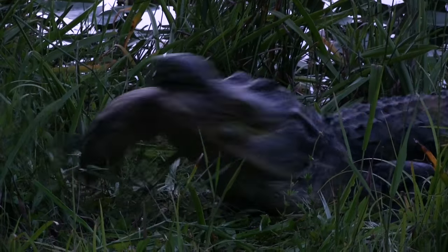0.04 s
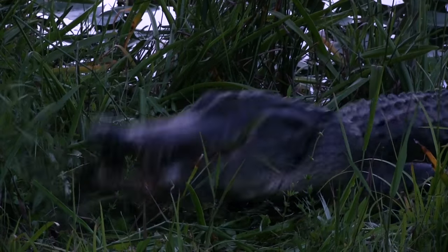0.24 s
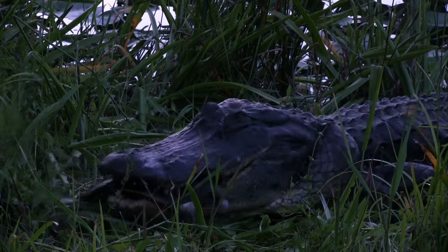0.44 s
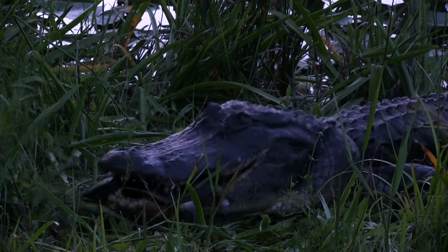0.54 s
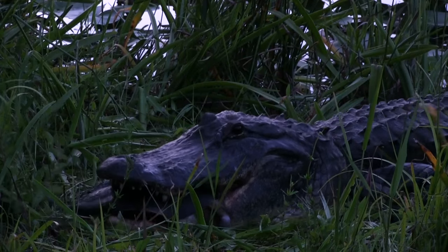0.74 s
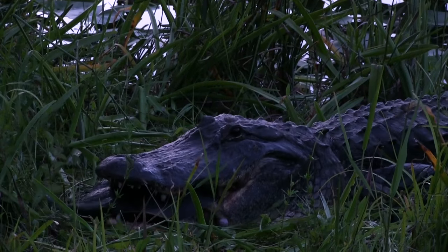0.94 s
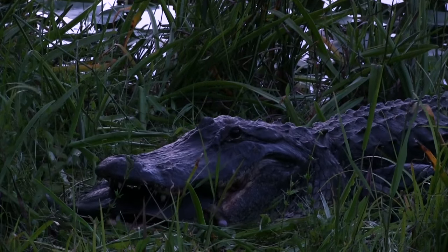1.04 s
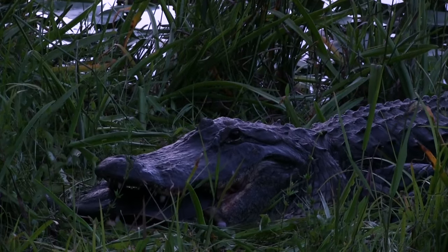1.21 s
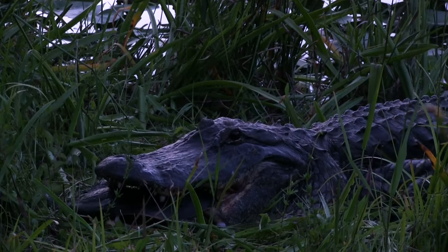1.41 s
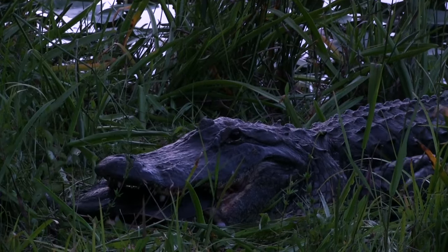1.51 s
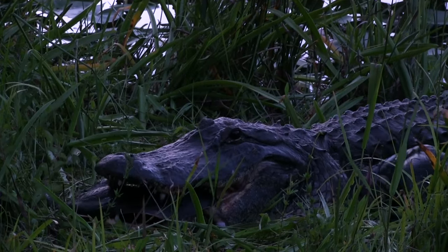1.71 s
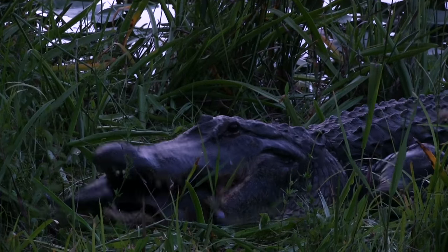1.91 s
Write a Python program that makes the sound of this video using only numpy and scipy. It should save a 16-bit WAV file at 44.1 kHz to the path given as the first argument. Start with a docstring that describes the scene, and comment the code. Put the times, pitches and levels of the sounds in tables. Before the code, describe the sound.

An alligator's jaws snap shut a few metres away at about 0.2 seconds with a short, hollow thud. Rapid bony cracks, knocks and wet crunching follow, ending in one more sharp bite near 0.45 seconds with a faint echo. Quiet crickets and a low, distant rumble continue throughout, until about 2 seconds. A higher insect chirps thinly around 0.8, 1.3 and 1.8 seconds.

```python
"""In a marsh at dusk, an alligator a few metres away snaps its jaws shut on prey in the wet grass.
Crickets trill with their wings and other insects sing over a low, distant rumble.
The jaws meet with a thud, the bites knock the skull, and the air in the closing mouth rings hollow.
Shell or bone breaks in a quick run of cracks over the wet crackle of crushed flesh and grass.
The reeds send back a faint echo."""
import sys
import numpy as np
from scipy import signal
from scipy.fft import rfft, irfft
from scipy.io import wavfile

SR = 44100
rng = np.random.default_rng(int(sys.argv[2]) if len(sys.argv) > 2 else 0)


def unload_wav(signal):
    """Save mono or channel-first audio to the path in sys.argv[1] as 16-bit WAV at rate SR, clipped to [-1, 1]."""
    wavfile.write(
        sys.argv[1],
        SR,
        np.round(np.clip(np.atleast_2d(signal).T, -1, 1) * 32767).astype(np.int16),
    )


N = 85995

# tone of the distant rumble and air: (frequency [Hz], level [dB])
AIR_TONE = [(25, -9.5), (60, -2.5), (110, 2), (200, -1), (400, -7.5), (1000, -11), (2000, -20), (3500, -23),
            (4800, -15.5), (7000, -17.5), (9500, -17), (11000, -21.5), (13500, -19), (16000, -31)]
# tone of the high insect hiss: (frequency [Hz], level [dB])
HISS_TONE = [(5000, -16), (8000, 2.5), (9900, 2.5), (10700, -4.5), (13500, 3.5), (14500, -21), (16000, -6)]
# how that hiss rises and falls: (time [s], level [dB])
HISS_LEVELS = [(0, -77), (.2, -62), (.55, -54.5), (.7, -58.5), (.85, -63), (1.4, -66), (1.72, -56),
               (1.95, -56.5)]
# steady, far insects: (pitch [Hz], band width [Hz], level [dB])
STEADY_INSECTS = [(4780, 50, -66.5), (6900, 94, -67.5)]
# blur of far crickets: (pitch [Hz], band width [Hz], level [dB])
CRICKET_BLUR = [(5857, 440, -54.5)]
# single crickets: (pitch [Hz], level [dB], wing strokes [per s])
CRICKET_VOICES = [(5670, -58, 65), (5706, -57, 64), (5950, -55.5, 61)]
# how the crickets swell together: (time [s], level change [dB])
CRICKET_SWELL = [(0, 2), (.12, -0.5), (.15, 4), (.2, -3), (.52, -1.5), (.76, 1), (.83, 0), (.97, 4.5),
                 (1.3, -3), (1.51, 4.5), (1.66, -2), (1.83, 4), (1.95, -0.5)]
# phrases of a higher insect: (start time [s])
CHIRP_STARTS = [.822, 1.312, 1.765]
# how wide the background sounds: (frequency [Hz], sides compared with centre [dB])
STEREO_WIDTH = [(60, -17), (110, -14.5), (200, -9), (380, -4.5), (700, -1.5), (2400, -0.5), (4400, -2),
                (8000, -7.5), (15000, -14)]
# tone of the echo from the reeds: (frequency [Hz], level [dB])
REEDS_TONE = [(100, -17.5), (330, -3.5), (1000, 0.5), (3000, -3), (8000, -3.5), (16000, 3)]
# tone of the sound bouncing off nearby grass: (frequency [Hz], level [dB])
GRASS_TONE = [(100, -7), (300, -4), (700, -3), (2000, -5), (6000, -3), (14000, 5)]
# how the wet crushing rises and falls: (time [s], level [dB])
CRUSH_LEVELS = [(.11, -58.5), (.16, -47), (.192, -37), (.201, -44), (.214, -28.5), (.238, -20), (.262, -35),
                (.276, -27), (.288, -32), (.322, -27.5), (.332, -30), (.340, -27.5), (.362, -39.5),
                (.412, -38), (.434, -21.5), (.446, -31.5), (.466, -53), (.52, -49.5), (.62, -58.5)]
# tone of the wet crushing: (frequency [Hz], level [dB])
CRUSH_TONE = [(80, -15.5), (250, 1.5), (600, 2.5), (1200, -4), (2500, -3.5), (5000, -7), (7500, -7.5),
              (11000, -13.5), (16000, -25.5)]
# heavy bites that knock the skull: (time [s], level [dB])
HEAVY_BITES = [(.2135, -18), (.2352, -16), (.2755, -15.5), (.2985, -25), (.3215, -24.5), (0.3377, -24),
               (.4335, -19), (.4425, -36)]
# notes the skull rings at: (pitch [Hz], level [dB], time to fade by 60 dB [s])
SKULL_NOTES = [(629, -3.5, 0.041), (730, -5.5, 0.023), (903, -6.5, 0.056), (1180, -3.5, 0.056),
               (1258, -13.5, 0.082), (1543, -9.5, 0.025)]
# hollow rings of the mouth:
# (time [s], level [dB], start pitch [Hz], end pitch [Hz], rise [ms], decay [ms])
MOUTH_RINGS = [(.160, -29, 532, 600, 1.9, 2.4), (0.178, -21, 390, 420, 1.4, 2.1),
               (.204, -16, 364, 373, 2.9, 4.2), (0.2124, -3.5, 361, 361, 2.3, 5),
               (.230, -6.5, 386, 504, 5.4, 10.3), (0.2755, -16.5, 350, 363, 1.3, 3.5),
               (0.3187, -20.5, 361, 374, 1, 5.4), (.420, -21.5, 359, 360, 0.71, 12.5),
               (0.4316, -25, 294, 297, 2.2, 2.5), (.442, -25.5, 331, 321.6, 1.3, 21.4),
               (0.644, -37.5, 336, 456, 10.3, 17)]
# tone of the splintering: (frequency [Hz], level [dB])
SPLINTER_TONE = [(100, -24), (300, -7), (800, -0.5), (2800, 1), (5200, -9), (7000, -0.5), (10500, -8),
                 (13000, -7), (16000, -14)]
# breaks of shell or bone: (time [s], level [dB], ring pitch [Hz], decay [ms])
BREAKS = [(0.1505, -40.5, 1830, 3.4), (0.1735, -35.5, 1850, 2.8), (.1858, -44, 4000, 1.2),
          (0.1899, -29.5, 1840, 3.5), (0.2126, -15, 1860, 2.4), (0.2161, -24, 5500, 1.9),
          (0.2265, -14, 5860, 1.54), (0.2351, -15.5, 3560, 2.2), (.2380, -18.5, 1610, 2.2),
          (0.2472, -22.5, 2000, 2.1), (0.2679, -22, 6500, 1.4), (0.2722, -7.5, 5870, 0.79),
          (0.2747, -13.5, 3200, 1.15), (.2870, -22, 6470, 1.2), (.2930, -17.5, 5500, 0.7),
          (0.2965, -8.5, 7140, 1.03), (0.2989, -14.5, 3230, 1.9), (.3122, -8, 2470, 0.36),
          (0.3154, -8.5, 2980, 1.5), (.3201, -16, 3500, 0.85), (0.3218, -11.5, 1480, 1.3),
          (0.331, -20, 5030, 1.2), (0.3358, -13.5, 3820, 1.14), (0.3379, -6, 6400, 0.68),
          (.3688, -30, 4500, 1.5), (.3870, -24, 2960, 2.7), (0.3994, -13.5, 5970, 0.25),
          (.4197, -5.5, 2730, 0.74), (.4212, -18, 2100, 2.5), (.4267, -24, 7000, .7),
          (0.4323, -13.5, 4300, 2.1), (0.4348, -17, 3960, 2), (0.4492, -28, 2480, 1.7),
          (0.642, -48, 780, 4.7)]

SIDES = np.array([[1], [-1]])  # adds a sound to the left ear and subtracts it from the right


def undb(db):
    """Turn decibels into a number to multiply by."""
    return 10 ** (np.asarray(db) / 20)


def unit(x):
    """Scale a sound to an average power of 1."""
    return x / np.sqrt(np.mean(x ** 2) + 1e-20)


def since(start):
    """Seconds since a moment, zero before it."""
    return np.maximum(np.arange(N) / SR - start, 0)


def curve(rows):
    """A volume curve through (time [s], level [dB]) points."""
    return undb(np.interp(since(0), *np.array(rows).T))


def noise():
    """White noise: an even hiss."""
    return rng.standard_normal(N)


def wander(rate_hz):
    """A smooth random wobble of about 1 either way; a higher rate wobbles faster."""
    smoothing = np.exp(-(np.fft.rfftfreq(N, 1 / SR) / rate_hz) ** 2)
    return unit(irfft(rfft(noise()) * smoothing, N))


def tone_gains(points, size):
    """A gain for every frequency, drawn through (frequency [Hz], level [dB]) points."""
    hz, db = np.array(points).T
    return undb(np.interp(np.log(np.fft.rfftfreq(size, 1 / SR) + 1), np.log(hz), db))


def colour(x, points, size=2048):
    """Give a sound the tone of a table, with a filter that leaves white noise equally strong."""
    cepstrum = irfft(np.log(tone_gains(points, size)))
    # fold it in half, so the filter never rings before the sound arrives
    cepstrum[1:size // 2] *= 2
    cepstrum[size // 2 + 1:] = 0
    response = irfft(np.exp(rfft(cepstrum)))
    return signal.fftconvolve(x, response / np.linalg.norm(response))[:N]


def band(x, hz, width):
    """Let a sound ring around one pitch."""
    peak_hz = min(hz, SR / 2 - 1)
    sharpness = hz / min(width, SR / 4)
    return signal.lfilter(*signal.iirpeak(peak_hz, sharpness, fs=SR), x)


def marsh_air(air_db=-50, drift_db=0.23, flicker_db=1.4):
    """Distant rumble and air, with the rasping hiss of far insects."""
    air = colour(noise(), AIR_TONE) * undb(drift_db * wander(7.2))
    hiss = colour(noise(), HISS_TONE) * undb(flicker_db * wander(60))
    return undb(air_db) * air + curve(HISS_LEVELS) * hiss


def far_insects(rows):
    """Many far insects blur into narrow bands of noise."""
    return sum(undb(db) * unit(band(band(noise(), hz, width), hz, width)) for hz, width, db in rows)


def whistle(start_s=0.055, length_s=0.12, start_hz=2300, rise_hz_per_s=4400, wander_hz=30, db=-58):
    """One faint rising note, perhaps a far bird."""
    t = since(start_s)
    pitch = start_hz + rise_hz_per_s * t + wander_hz * wander(104)
    arch = np.sin(np.pi * np.minimum(t / length_s, 1))
    return undb(db) * arch * np.sin(2 * np.pi * np.cumsum(pitch) / SR)


def crickets(unevenness=.15, wander_hz=54.8, sag_hz=160, flutter_db=1):
    """Crickets trill with wing strokes that each sag in pitch, over a blur of far insects."""
    trills = np.zeros(N)
    for hz, db, rate in CRICKET_VOICES:
        strokes_per_s = rate * (1 + unevenness * wander(29.2))
        stroke = (rng.random() + np.cumsum(strokes_per_s) / SR) % 1  # runs from 0 to 1 in each stroke
        pitch = hz + wander_hz * wander(79.6) - sag_hz * (stroke - .5)
        pulses = np.sin(np.pi * stroke) ** 2 * undb(flutter_db * wander(40))
        trills += undb(db) * unit(pulses * np.sin(2 * np.pi * np.cumsum(pitch) / SR))
    chorus = (trills + far_insects(CRICKET_BLUR)) * curve(CRICKET_SWELL)
    return chorus + far_insects(STEADY_INSECTS)


def chirping_insect(hz=7660, db=-53.5, notes=4, notes_per_s=29, wander_hz=28, flutter_db=3):
    """A higher insect repeats a short phrase of thin, linked notes."""
    note_counts = [notes_per_s * since(start) for start in CHIRP_STARTS]
    pulses = sum(np.abs(np.sin(np.pi * count)) * (count < notes) for count in note_counts)
    volume = undb(db + flutter_db * wander(120))
    pitch = hz + wander_hz * wander(147)
    return volume * pulses * np.sin(2 * np.pi * np.cumsum(pitch) / SR)


def background():
    """Insects, whistle and air all around; the bass is nearly the same in both ears."""
    centre, side = (crickets() + chirping_insect() + whistle() + marsh_air() for _ in range(2))
    side = irfft(rfft(side) * tone_gains(STEREO_WIDTH, N), N)
    return centre + side * SIDES


def echo(x, fade, tone):
    """Countless tiny reflections smear a sound out along a fading curve."""
    reflections = unit(colour(noise() * fade, tone)) / np.sqrt(N)
    return signal.fftconvolve(x, reflections)[:N]


def reeds_and_grass(x, delay_s=.02, fade_60db_s=0.54, reeds_db=-21.5, grass_db=-15.5, grass_s=0.0028):
    """The reeds add a faint, wide echo to a sound; nearby grass spreads it a little to the sides."""
    t = since(delay_s)
    fade = (t > 0) * np.exp(-np.log(1000) * t / fade_60db_s)
    centre, side = (echo(x, fade, REEDS_TONE) for _ in range(2))
    reeds = centre + undb(-4) * side * SIDES
    grass = echo(x, np.exp(-since(0) / grass_s), GRASS_TONE)
    return x + undb(reeds_db) * reeds + undb(grass_db) * grass * SIDES


def wet_crush(pops_per_s=5000, spread_db=2.5, range_db=14, patchy_db=2):
    """Crushed flesh and grass crackle with a crowd of tiny wet pops of uneven size."""
    size_db = np.minimum(spread_db * rng.exponential(size=N), range_db)
    pops = (rng.random(N) < pops_per_s / SR) * np.sign(noise()) * undb(size_db)
    crackle = unit(pops) * curve(CRUSH_LEVELS) * undb(patchy_db * wander(93))
    return colour(crackle, CRUSH_TONE)


def swell(t, rise, decay):
    """A volume curve that rises smoothly, then dies away."""
    return np.sin(np.pi / 2 * np.minimum(t / rise, 1)) ** 2 * np.exp(-np.maximum(t - rise, 0) / decay)


def jaw_thud(start_s=.2105, hz=163, db=-10, rise_s=0.003, decay_s=0.0035):
    """The jaws meet with one short, low thud."""
    t = since(start_s)
    return undb(db) * swell(t, rise_s, decay_s) * np.sin(2 * np.pi * hz * t)


def skull_knocks(pitch_spread=0.031):
    """Each heavy bite makes the skull ring briefly at several pitches at once."""
    out = np.zeros(N)
    for start, bite_db in HEAVY_BITES:
        t = since(start)
        for k, (hz, note_db, fade_60db_s) in enumerate(SKULL_NOTES):
            pitch = hz * (1 + pitch_spread * rng.standard_normal())
            fade = np.exp(-np.log(1000) * t / fade_60db_s)
            direction = (-1) ** k  # neighbouring notes start their swing opposite ways
            out += direction * undb(bite_db + note_db) * fade * np.sin(2 * np.pi * pitch * t)
    return out


def hollow_mouth(glide_s=0.0254):
    """The air in the mouth rings, and its pitch slides as the space changes size."""
    out = np.zeros(N)
    for start, db, from_hz, to_hz, rise_ms, decay_ms in MOUTH_RINGS:
        t = since(start)
        pitch = to_hz + (from_hz - to_hz) * np.exp(-t / glide_s)
        volume = undb(db) * swell(t, rise_ms / 1000, decay_ms / 1000)
        out += volume * np.sin(2 * np.pi * np.cumsum(pitch * (t > 0)) / SR)
    return out


def cracks(ring_width=0.52, tail_db=-21.5, tail_s=0.011, splinter_db_per_octave=3.5):
    """Shell or bone breaks in bursts of tiny fractures; each piece rings and splinters."""
    out = np.zeros(N)
    for start, db, hz, decay_ms in BREAKS:
        t = since(start)
        decay_s = decay_ms / 1000
        burst = (t > 0) * (np.exp(-t / decay_s) + undb(tail_db) * np.exp(-t / tail_s))
        fractures = burst * noise() + 1e-18
        ring = band(band(fractures, hz, hz * ring_width), hz, hz)
        splinters = colour(burst * noise(), SPLINTER_TONE)
        # small, high-ringing pieces splinter more
        splinter_db = -6 + splinter_db_per_octave * np.log2(hz / 4000)
        crack = unit(ring) + undb(splinter_db) * unit(splinters)
        out += undb(db) * unit(crack) * np.sqrt(decay_s * SR / N)  # longer cracks carry more energy
    return out


def scene(low_cut_hz=100.6):
    """The bite in the centre, with little deep bass, and the marsh all around."""
    bite = cracks() + hollow_mouth() + jaw_thud() + skull_knocks() + wet_crush()
    low_cut = signal.butter(4, low_cut_hz, "high", fs=SR, output="sos")
    return signal.sosfilt(low_cut, reeds_and_grass(bite)) + background()


def record(dry, ceiling=.85, top_hz=15800):
    """Flatten the tallest peaks, then cut the highest treble."""
    treble_cut = signal.ellip(10, .2, 80, top_hz, fs=SR, output="sos")
    return signal.sosfilt(treble_cut, np.clip(dry, -ceiling, ceiling))


dry = scene()
out = record(dry)
unload_wav(out)
```